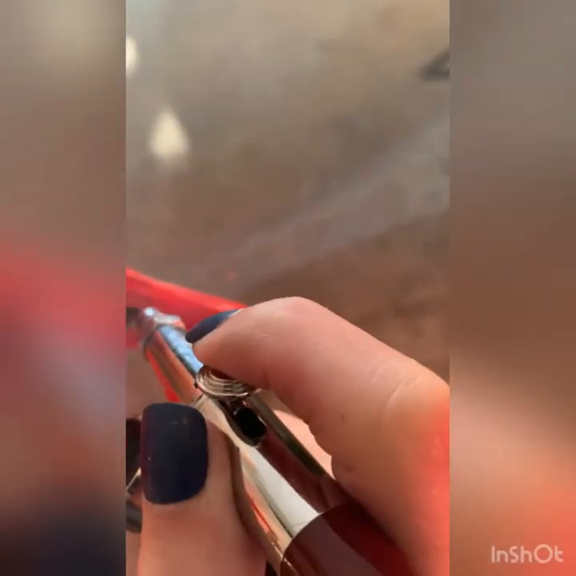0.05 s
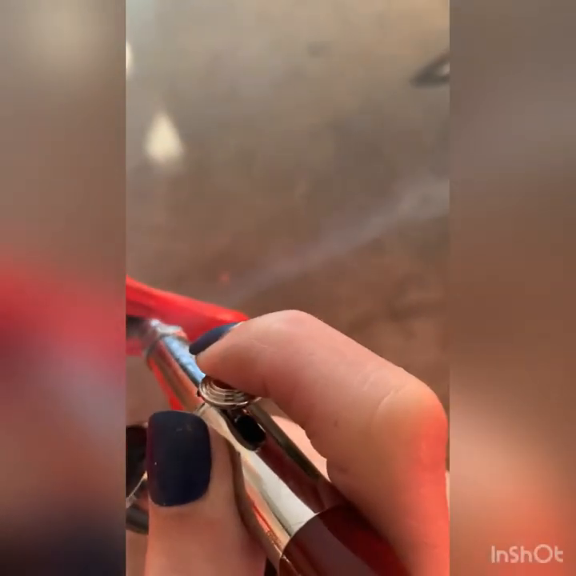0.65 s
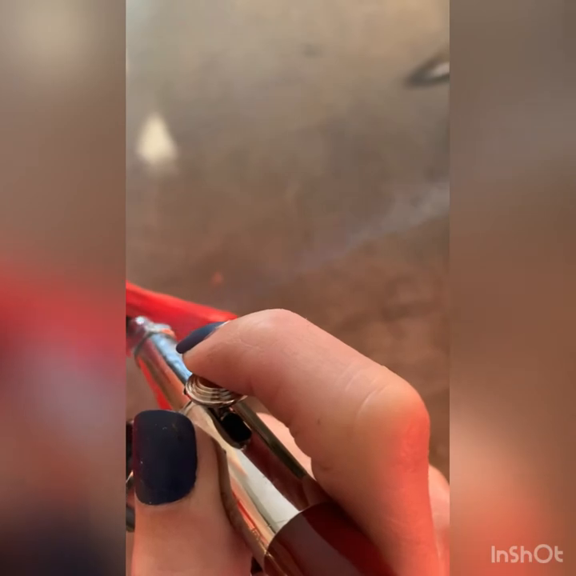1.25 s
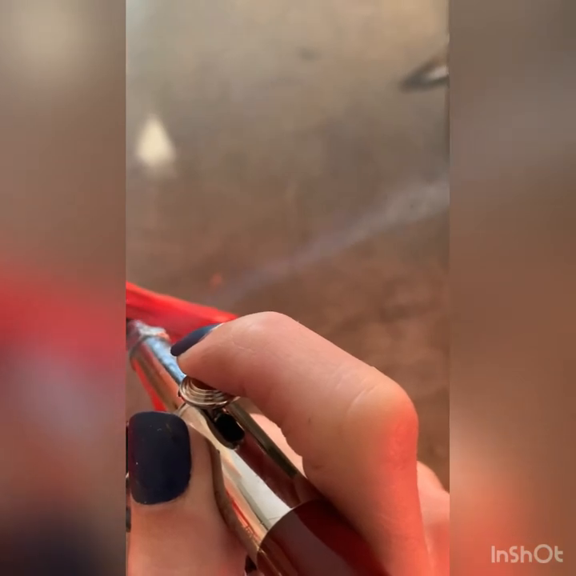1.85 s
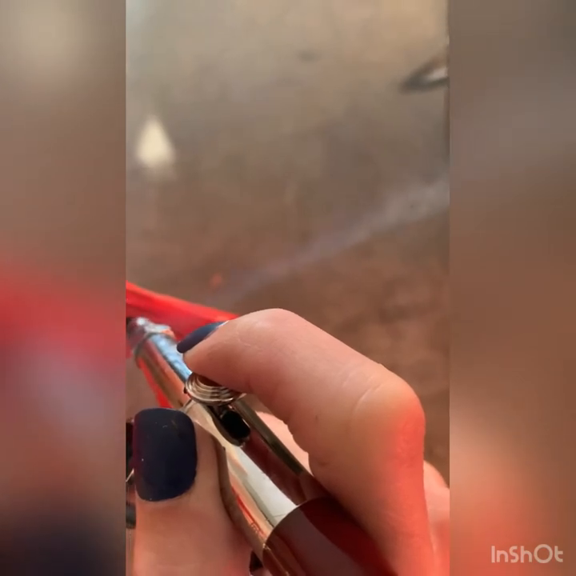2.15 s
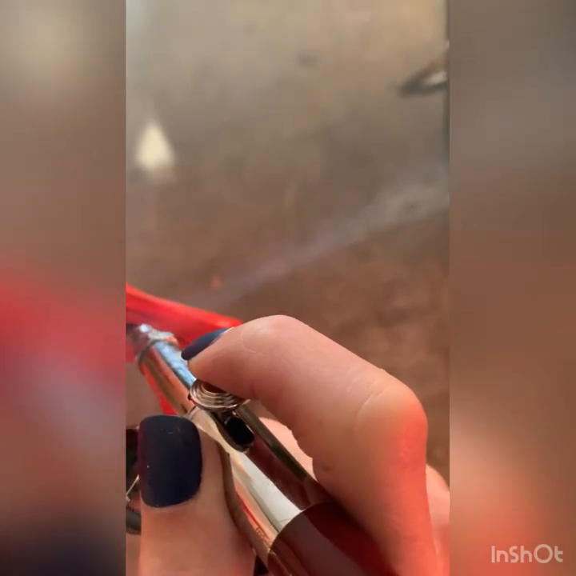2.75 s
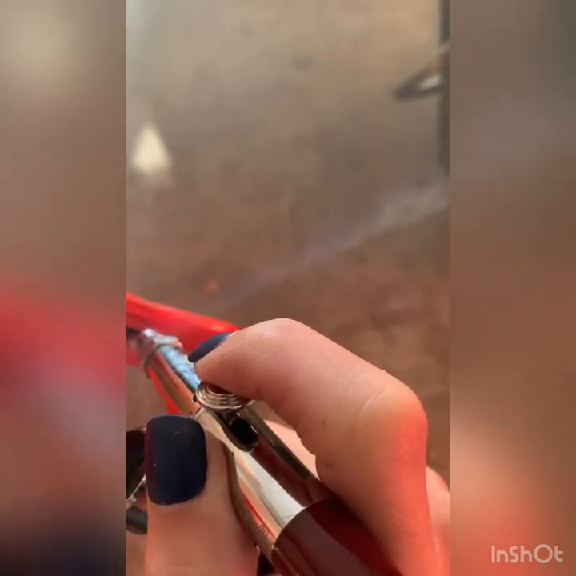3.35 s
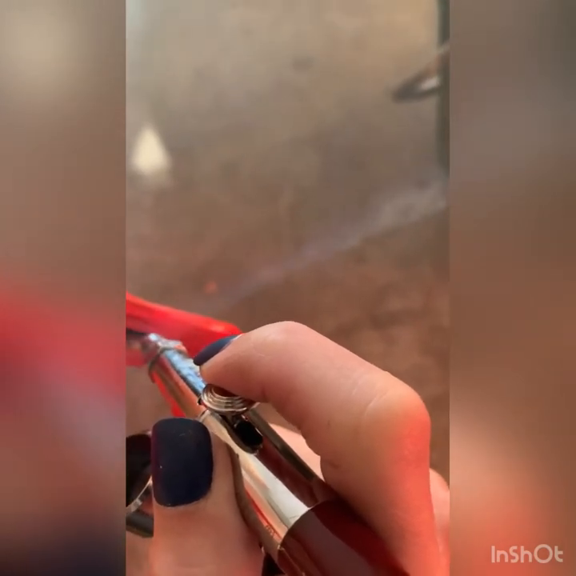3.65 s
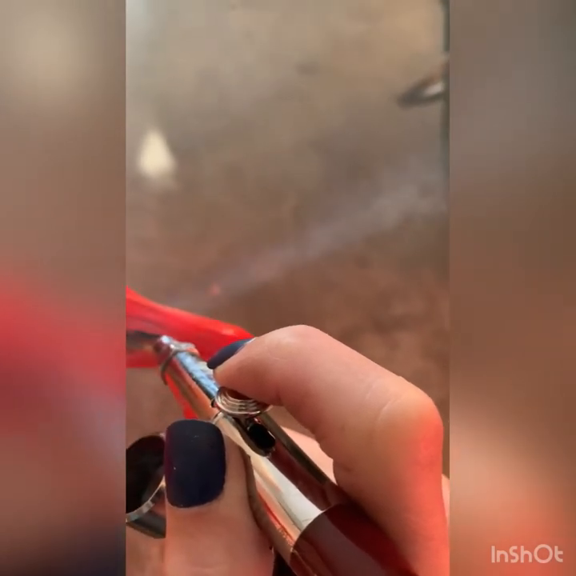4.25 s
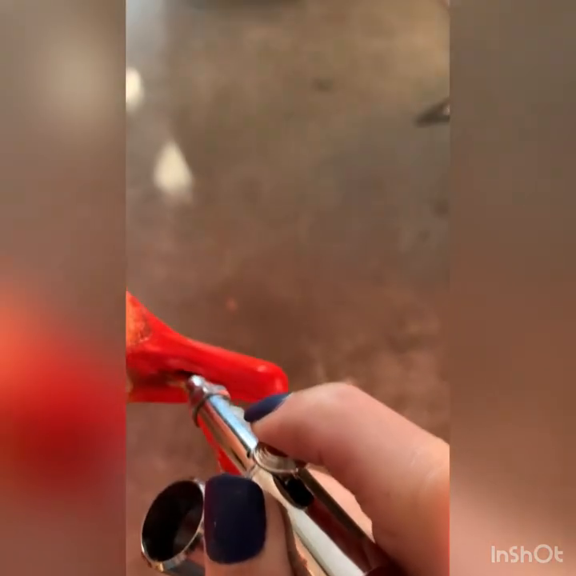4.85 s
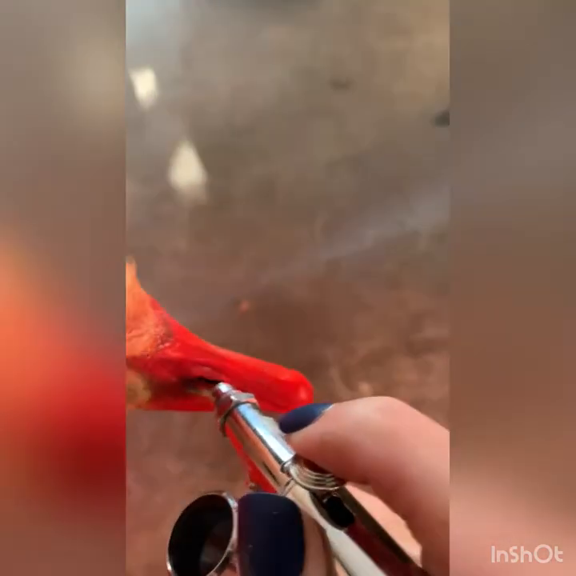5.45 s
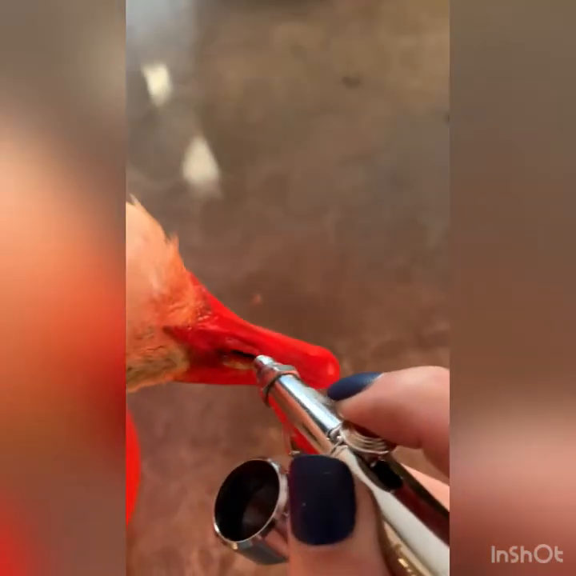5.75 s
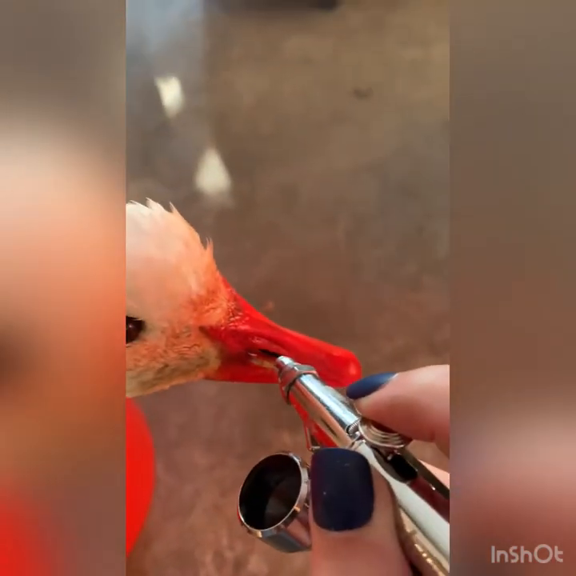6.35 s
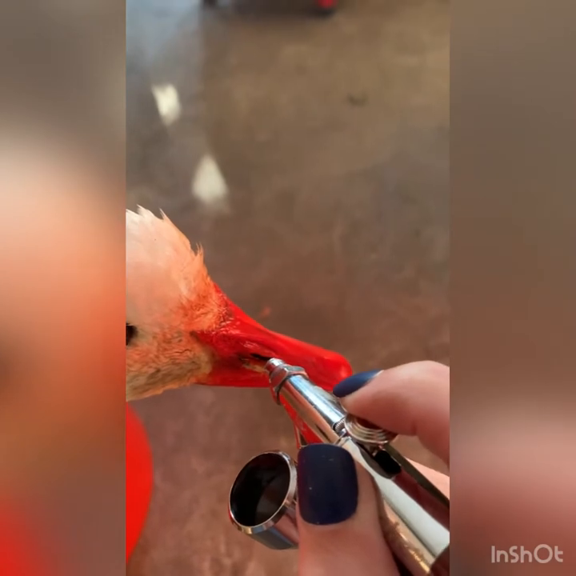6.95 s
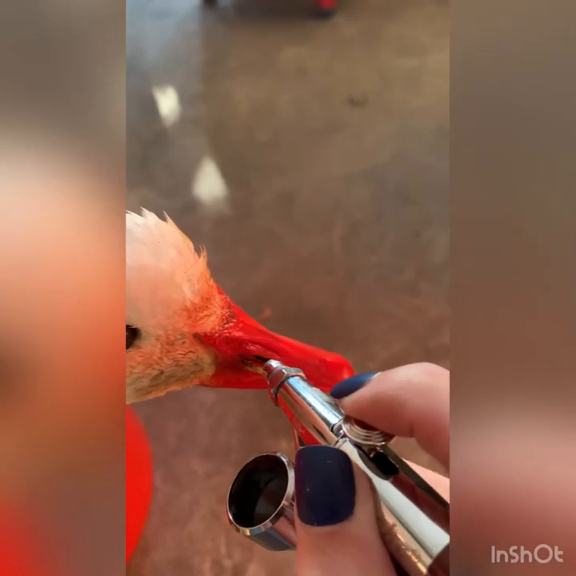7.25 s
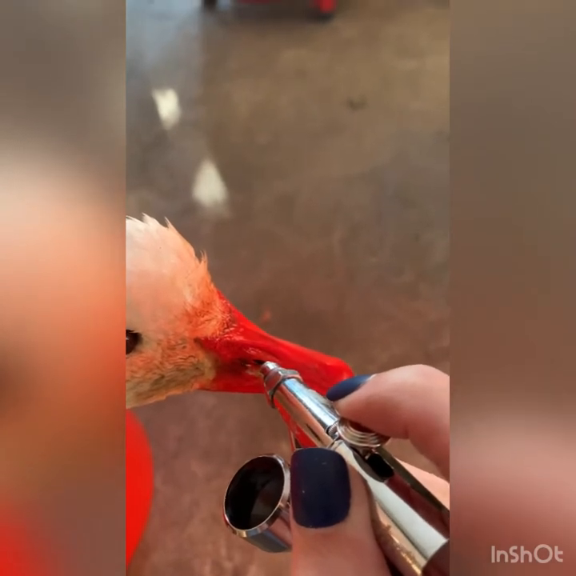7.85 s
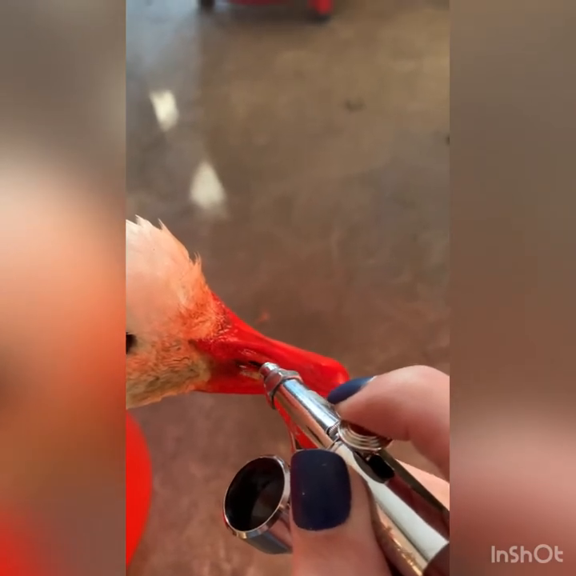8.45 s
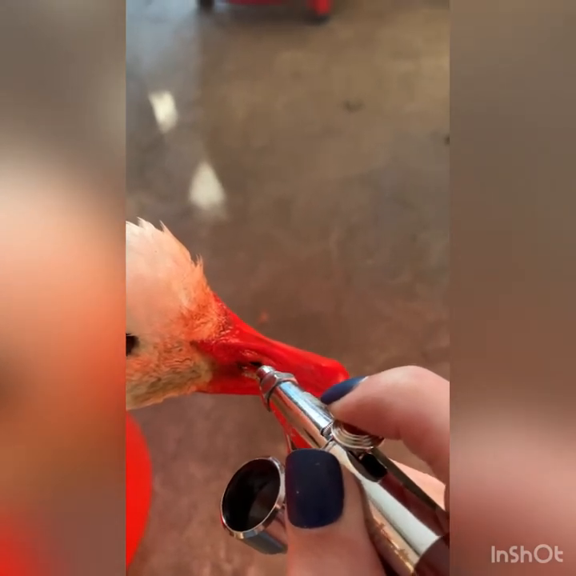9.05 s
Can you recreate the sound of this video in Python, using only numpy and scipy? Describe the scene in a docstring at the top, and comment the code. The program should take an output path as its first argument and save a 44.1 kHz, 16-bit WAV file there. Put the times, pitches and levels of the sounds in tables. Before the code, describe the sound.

An airbrush sprays a small figure close to the microphone in a small, dry room. A bright, high hiss starts almost at once and wavers as the hand moves, with two soft handling bumps beneath it. About halfway it cuts off sharply, leaving a low motor hum and dull room air. A second later the spray returns gently, opens up and runs to the end.

```python
"""An airbrush paints a small figure, a hand's width from a two-port microphone, in a small, dry room.
A motor hums throughout. At 0.4 s the trigger opens the valve: the turbulent jet hisses brightly and
adds a lower rush where it strikes the figure, changing as the hand moves. A brief low tone and two
soft bumps pass under it. At 5 s the jet cuts off sharply; the hand faintly brushes the figure.
At 6.1 s a second burst starts gently, opens up at 6.7 s and runs to the end."""
import sys
import numpy as np
from scipy import signal
from scipy.fft import rfft, irfft
from scipy.io import wavfile
from scipy.ndimage import uniform_filter1d

SR = 44100
rng = np.random.default_rng(int(sys.argv[2]) if len(sys.argv) > 2 else 0)


def wrap_up_sound(samples):
    """Save the sound to the file named by the first command line argument, as 16-bit audio."""
    columns = np.atleast_2d(samples).T
    # keep every value between -1 and 1, then stretch to whole-number steps
    tamed = np.clip(columns, -1, 1)
    steps = np.round(tamed * 32767).astype(np.int16)
    wavfile.write(sys.argv[1], SR, steps)


N = 406161
TIME_S = np.arange(N) / SR
FREQ_HZ = np.fft.rfftfreq(N, 1 / SR)

# Broad jet colour. Each row: frequency in Hz, relative density in dB.
JET_SPECTRUM = [(60, -45), (200, -31.0), (300, -28.0), (900, -25.1), (1500, -23.1), (2400, -16.8),
                (3500, -15.9), (5900, -13.5), (6500, -8.0), (8400, -6.7), (9200, -1.8), (10500, -4.4),
                (13000, -5.2), (15600, -3.6)]
# Peaks and dips from nozzle cap and near surfaces. Each row: centre in Hz, width in Hz, gain in dB.
JET_RESONANCES = [(580, 110, 3.3), (1020, 220, 4.2), (1230, 170, -5.6), (1620, 250, 5.2), (2150, 210, 5.4),
                  (2440, 200, 5.2), (2900, 120, 1.8), (3120, 130, -7.4), (3300, 150, 1.5), (3560, 170, -2),
                  (4950, 250, 1.5), (5600, 300, 1), (6580, 380, 4.5), (6900, 200, -3), (11140, 350, 2.1),
                  (11680, 280, -1.5), (12220, 310, 3.1), (14200, 730, 4.0)]
# The jet sits to the left. Each row: frequency in Hz, left port's phase lead in radians.
JET_PHASE_LEAD = [(100, 0), (650, -1.0), (1000, -.1), (1800, .1), (2150, 1.1), (2500, 1.1), (2850, .7),
                  (3300, 2.1), (3750, 2.2), (4300, 3.0), (4950, 3.3), (5300, 4.1), (6000, 5.0), (6500, 5.9),
                  (8800, 9.42), (11000, 12.57), (13150, 15.7), (15400, 18.85)]
# Jet likeness at the ports. Each row: frequency in Hz, coherence 0-1.
JET_COHERENCE = [(100, .95), (800, .7), (1100, .9), (1700, .94), (2400, .8), (3100, .7), (4100, 1),
                 (5000, 1), (5600, .88), (7500, .94), (8600, 1), (9200, 1), (10500, .93), (12800, 1),
                 (13500, 1), (15000, .93)]
# Jet balance. Each row: frequency in Hz, left minus right in dB.
JET_PAN = [(300, 3.2), (700, -3.2), (1300, -1.4), (2400, -1.5), (4400, 0), (15000, 0)]
# Reference bands of hiss, shush, rush and sizzle. Each row: low edge in Hz, high edge in Hz.
JET_BAND_EDGES = [(9500, 12400), (5500, 8400), (900, 3000), (13800, 15800)]
# Trigger presses. Each row: fully open at in seconds, opening time in seconds, release in seconds.
TRIGGER_PRESSES = [(0.419, 0.029, 4.959), (6.073, 0.066, 9.3)]
# Jet bands as the hand moves: first press, then the second, gentle and pulled further back.
# Each row: time in seconds, relative hiss level in dB, then shush, rush and sizzle in dB re hiss.
SPRAY_FIRST = [(0.43, -32, -2.5, -10, -3.5), (0.67, -32.5, -4, -11, -4), (0.72, -35, -4.5, -11.5, -2),
               (1.03, -34, -4, -11.5, -3.5), (1.08, -36, -2, -9.5, 2), (1.115, -31.5, -3, -12.5, -5),
               (1.18, -30, -1, -13.5, 0.5), (1.203, -24.5, -2.5, -15.5, -6), (1.252, -24, -4, -21.5, -7),
               (1.282, -30, -5.5, -13.5, -2), (1.345, -28.5, -4.5, -10.5, -2),
               (1.52, -34.5, -4.5, -15.5, -6), (1.6, -30.5, -4, -13, -1), (1.78, -32, -5.5, -16, -2),
               (1.85, -29, -6.5, -15, -4.5), (2.41, -26.5, -4.5, -15.5, -4.5),
               (2.57, -26.5, -5.5, -15.5, -4), (3.12, -35, -2.5, -9, 0), (3.34, -33.5, -3.5, -13, -2),
               (3.52, -32.5, -4.5, -9.5, -4), (3.72, -35.5, -1.5, -10.5, 0), (3.94, -31.5, -6, -13, -4),
               (3.99, -32.5, -2.5, -8.5, -2.5), (4.31, -33.5, -2, -12, -0.5), (4.45, -30.5, -5, -13.5, 4.5),
               (4.66, -26.5, -2.5, -19, 2.5), (4.8, -28.5, -3.5, -15.5, 2), (4.89, -26.5, -4, -20.5, 3),
               (4.95, -31.5, -3.5, -19, 1.5)]
SPRAY_GENTLE = [(6.085, -45.5, 5.5, -7.5, -3), (6.105, -37.5, 1.5, -18, -3), (6.165, -34.5, 3, -16, -1),
                (6.38, -34, -1, -17.5, -2), (6.486, -40.5, 3, -15, -1), (6.615, -35, -3, -19, -3),
                (6.655, -32.5, -4, -20, 2)]
SPRAY_FULL = [(6.685, -26.5, -6, -18, 3), (6.746, -29, -3, -14.5, 5.5), (6.9, -31, -0.5, -14, 5),
              (7.0, -26, -4, -14.5, -1), (7.15, -27, -4, -16.5, -1), (7.18, -27, -3, -20.5, 3),
              (7.25, -31, -3.5, -17.5, 0.5), (7.414, -26, -4.5, -21, 1.5), (7.59, -33, -4, -18.5, 0),
              (7.72, -31.5, -5, -19.5, 0), (7.941, -38, -2, -12.5, 4), (8.43, -30.5, -3.5, -20, -2),
              (8.502, -33.5, -3, -16.5, 1), (8.84, -29, -4.5, -19, 1.5), (9.02, -33, -5, -17, 2),
              (9.04, -35.5, 0, -11.5, 2), (9.18, -37, -2.5, -13, 2)]
# Nozzle path from the figure's thin tip to its broad head. Each row: time in seconds, share 0-1.
NOZZLE_PATH = [(4.1, 0), (4.7, 0.08), (6.1, 0.7)]
# Colour change at the path's end. Each row: centre in Hz, width in Hz, gain in dB.
HEAD_RESONANCES = [(1640, 550, 3), (2400, 650, -1.5), (3640, 130, -9), (4860, 220, 4), (6400, 430, -2),
                   (7500, 200, -3)]
# Small surfaces reflect short waves best. Each row: frequency in Hz, rms comb depth in dB.
ECHO_DEPTH = [(700, 1.9), (2200, 1.9), (6000, 2.2)]
# Valve leak whistles. Each row: centre in Hz, width in Hz, relative level in dB.
LEAK_WHISTLES = [(3850, 300, -8), (6500, 700, -2), (7350, 450, -0.5), (8000, 600, -4), (9500, 400, -7),
                 (15250, 400, -8)]
# Motor hum swell. Each row: time in seconds, relative level in dB.
HUM_SWELL = [(0.0, -69), (0.35, -48), (0.62, -43), (1.06, -78), (1.18, -67), (1.6, -49.5), (2.56, -44.5),
             (3.3, -51), (3.85, -52.5), (3.97, -66), (4.13, -52), (4.28, -56), (4.38, -48.5), (4.82, -53.5),
             (5.94, -42.5), (6.52, -51.5), (6.74, -47.5), (7.9, -52.0), (8.44, -59), (8.53, -78),
             (9.18, -68)]
# Motor hum and whirr tones. Each row: frequency in Hz, relative level in dB, waver 0-1.
HUM_PARTIALS = [(59.3, 2, 0.13), (192, -18.5, 0.7)]
WHIRR_PARTIALS = [(78.7, -10, 0.2), (191.3, -11.5, 1), (387.5, -16.5, .95), (558, -20.5, .95)]
# Hand on the airbrush. Each row: start in seconds, peak in dB, band frequency in Hz, decay in seconds.
HAND_KNOCKS = [(.192, -76, 3000, .003), (4.057, -48, 330, .01), (4.264, -44, 300, .012),
               (5.361, -77, 1600, .003), (5.519, -73, 9000, .002)]
# Sagging low tone. One row: start and length in seconds, first and last pitch in Hz, peak in dB.
SAGGING_TONE = (3.44, .125, 280, 240, -44)
# Hand on the figure. One row: start and length in seconds, centre and width in Hz, level in dB.
SKIN_STROKE = (5.1, .44, 1750, 650, -81)
# Room tail, strongest in the low treble as the highs beam onto the figure.
# Each row: frequency in Hz, T60 in seconds, level in dB re the direct sound.
ROOM_DECAY = [(200, .35, -26), (1200, .42, -20), (2500, .38, -17), (4500, .3, -24), (6400, .32, -19),
              (7500, .3, -20.5), (9000, .24, -25.5), (15000, .22, -26.5)]
# Room air colour. Each row: frequency in Hz, relative density in dB.
AIR_SPECTRUM = [(20, -19.5), (42, -15.5), (53, 6), (66, 2), (105, -1), (140, -7), (165, -8), (205, 1.5),
                (300, -18.5), (450, -16), (570, -18), (900, -27), (1450, -35.5), (1800, -36), (3000, -47.5),
                (5500, -53.5), (8000, -52), (15000, -61.5)]
# Room air likeness at the ports. Each row: frequency in Hz, coherence 0-1.
AIR_COHERENCE = [(100, 0.99), (250, 0.87), (600, 0.24), (3000, 0.15), (12000, 0.26)]
# Room air swell, shared by the whirr. Each row: time in seconds, level in dB.
AIR_LEVEL = [(0, -56), (.6, -52.5), (2.1, -53), (2.9, -56.5), (4, -54.5), (4.95, -57.5), (6.3, -53.5),
             (7.3, -55.5), (7.8, -59.5)]


def jet(flutter_db=0.45, flutter_hz=35, eddy_db=2.0):
    """Turbulent nozzle air: big eddies rush, smaller ones shush and hiss, the finest sizzle."""
    colour_db = over_log_hz(JET_SPECTRUM, FREQ_HZ) + bells_db(JET_RESONANCES, FREQ_HZ)
    lead_rad = curves(JET_PHASE_LEAD, FREQ_HZ)[0]
    balance_db = over_log_hz(JET_PAN, FREQ_HZ)
    air = noise_pair(colour_db, over_log_hz(JET_COHERENCE, FREQ_HZ), lead_rad, balance_db)
    hz, t, spectrum = signal.stft(air, SR, nperseg=1024, noverlap=768)
    gain_db = hand_motion_db(air, hz, t)
    # the nozzle-figure gap rings differently along the path
    gain_db += curves(NOZZLE_PATH, t)[0] * bells_db(HEAD_RESONANCES, hz)[:, None]
    # passing eddies lift patches of the spectrum
    eddies = uniform_filter1d(rng.standard_normal(spectrum.shape[1:]), size=4, axis=0)
    eddies = unit_rms(uniform_filter1d(eddies, size=12, axis=1))
    gain_db += eddy_db * eddies
    gain_db += over_log_hz(ECHO_DEPTH, hz)[:, None] * echo_combs(hz, t)
    air = signal.istft(spectrum * amp(gain_db), SR, nperseg=1024, noverlap=768)[1][:, :N]
    return air * valve_flow() * amp(flutter_db * drift(flutter_hz))  # paint feeds unevenly


def hand_motion_db(air, hz, t, tremor_db=0.5, tremor_hz=9):
    """Gain of the four jet bands as the hand moves; its tremor tilts the jet and varies the rush."""
    hiss_db, shush_db, rush_db, sizzle_db = curves([*SPRAY_FIRST, *SPRAY_GENTLE, *SPRAY_FULL], t)
    rush_db += tremor_db * np.interp(t, TIME_S, drift(tremor_hz))
    # band crossfades, corners in Hz
    rush = over_log_hz([(3000, 1), (6000, 0)], hz)[:, None]
    shush = over_log_hz([(8100, 1), (9000, 0)], hz)[:, None] - rush
    sizzle = over_log_hz([(12300, 0), (14000, 1)], hz)[:, None]
    hiss = 1 - rush - shush - sizzle
    bands = zip((hiss, shush, rush, sizzle), (0, shush_db, rush_db, sizzle_db), JET_BAND_EDGES)
    return hiss_db + sum(share * (db - band_rms_db(air, *edges)) for share, db, edges in bands)


def valve_flow(barely_open_db=-53.5, close_s=0.038, seep_db=-63):
    """Each press opens the valve linearly in dB; a spring snaps it shut; a trace still seeps."""
    flow = np.full(N, amp(seep_db))
    for open_s, opening_s, release_s in TRIGGER_PRESSES:
        closure = np.maximum((open_s - TIME_S) / opening_s, (TIME_S - release_s) / close_s)
        flow += amp(barely_open_db * np.clip(closure, 0, 2))
    return flow


def echo_combs(hz, t, sway_ms=0.032, sway_hz=0.44):
    """Weak echoes off hand, figure and bench comb the spectrum; the combs slide as the hand sways."""
    combs = 0
    for delay_ms in rng.uniform(4, 14, size=20):
        shift_ms = sway_ms * np.interp(t, TIME_S, drift(sway_hz))
        combs += np.cos(2 * np.pi * hz[:, None] * (delay_ms + shift_ms) / 1000)
    return unit_rms(combs)


def valve_leak(level_db=-91, coherence=0.71):
    """Air threads through narrow gaps in the valve: faint, fuzzy whistles."""
    power = sum(amp(db) ** 2 / (1 + (2 * (FREQ_HZ - centre_hz) / width_hz) ** 2) ** 2
                for centre_hz, width_hz, db in LEAK_WHISTLES)
    return amp(level_db) * noise_pair(10 * np.log10(power), coherence)


def motor(hum_gain_db=-1, hum_waver_hz=6, whirr_waver_hz=14):
    """A low hum swells and fades beside a steadier, wavering whirr."""
    hum = sum(amp(db) * partial(hz, waver, hum_waver_hz) for hz, db, waver in HUM_PARTIALS)
    whirr = sum(amp(db) * partial(hz, waver, whirr_waver_hz) for hz, db, waver in WHIRR_PARTIALS)
    hum *= amp(curves(HUM_SWELL, TIME_S)[0] + hum_gain_db)
    whirr *= amp(curves(AIR_LEVEL, TIME_S)[0])
    return hum + whirr


def hand_knocks():
    """The hand clicks and bumps on the airbrush: damped noise, no ring."""
    knocks, t = np.zeros(N), TIME_S[:SR // 10]
    for start_s, peak_db, hz, decay_s in HAND_KNOCKS:
        band = signal.butter(2, [hz / 2, hz * np.sqrt(2)], "bandpass", fs=SR, output="sos")
        knock = signal.sosfilt(band, rng.standard_normal(len(t)) * np.exp(-t / decay_s))
        add(knocks, start_s, amp(peak_db) * knock / abs(knock).max())
    return knocks


def low_tone():
    """One brief tone, sagging in pitch."""
    start_s, length_s, first_hz, last_hz, peak_db = SAGGING_TONE
    glide_hz = np.linspace(first_hz, last_hz, int(length_s * SR))
    tone = np.hanning(len(glide_hz)) * np.sin(2 * np.pi * np.cumsum(glide_hz) / SR)
    track = np.zeros(N)
    add(track, start_s, amp(peak_db) * tone)
    return track


def skin_rustle(uneven_db=3.0, uneven_hz=14, coherence=0.3):
    """Skin slides unevenly over the figure: a faint noise band swells and fades."""
    start_s, length_s, centre_hz, width_hz, level_db = SKIN_STROKE
    stroke = np.sin(np.pi * np.clip((TIME_S - start_s) / length_s, 0, 1))
    band_db = -20 * np.log10(1 + (2 * (FREQ_HZ - centre_hz) / width_hz) ** 4)
    return noise_pair(band_db, coherence) * stroke * amp(level_db - uneven_db * drift(uneven_hz))


def room_tail(direct):
    """Short diffuse reverberation, different at each port; the treble dies first."""
    hz, t, spectrum = signal.stft(rng.standard_normal((2, SR // 2)), SR, nperseg=256)
    t60_s, level_db = curves(ROOM_DECAY, hz[:, None])
    unit_energy = np.sqrt(2 * np.log(1000) / (t60_s * SR))
    decay = unit_energy * amp(level_db - 60 * t / t60_s)
    response = signal.istft(spectrum * decay, SR, nperseg=256)[1]
    return signal.fftconvolve(direct, response, axes=1)[:, :N]


def room_air():
    """Dull noise of moving air, nearly mono in the bass."""
    air = noise_pair(over_log_hz(AIR_SPECTRUM, FREQ_HZ), over_log_hz(AIR_COHERENCE, FREQ_HZ))
    return air * amp(curves(AIR_LEVEL, TIME_S)[0])


def noise_pair(colour_db, coherence, lead_rad=0, balance_db=0):
    """Partly coherent coloured noise at the two ports, rms 1."""
    common, other = rfft(rng.standard_normal((2, N)))
    left = common * np.exp(1j * lead_rad) * amp(balance_db / 2)
    right = (coherence * common + np.sqrt(1 - coherence ** 2) * other) * amp(-balance_db / 2)
    return unit_rms(irfft(np.array([left, right]) * amp(colour_db), N))


def partial(hz, waver, rate_hz):
    """A tone whose strength and phase wander by the share waver."""
    wobble = (1 - waver) + waver * (drift(rate_hz) + 1j * drift(rate_hz)) / np.sqrt(2)
    carrier = np.exp(2j * np.pi * (hz * TIME_S + rng.random()))
    return np.sqrt(2) * (wobble * carrier).real


def drift(rate_hz):
    """Slow random motion, rms 1."""
    return unit_rms(irfft(rfft(rng.standard_normal(N)) / (1 + (FREQ_HZ / rate_hz) ** 4), N))


def band_rms_db(pair, low_hz, high_hz):
    """Level of one band in the mean of both ports."""
    band = rfft(pair.mean(0))[(FREQ_HZ >= low_hz) & (FREQ_HZ < high_hz)]
    return 10 * np.log10(2 * np.sum(abs(band) ** 2) / N ** 2)


def bells_db(peaks, hz):
    """Sum of bell-shaped peaks and dips."""
    return sum(db * np.exp2(-(2 * (hz - centre_hz) / width_hz) ** 2) for centre_hz, width_hz, db in peaks)


def over_log_hz(rows, hz):
    """Interpolates a table over log frequency."""
    row_hz, values = np.transpose(rows)
    return np.interp(np.log(hz + 1), np.log(row_hz + 1), values)


def curves(rows, at):
    """Interpolates each later column linearly over the first."""
    axis, *columns = np.transpose(rows)
    return [np.interp(at, axis, column) for column in columns]


def add(mix, start_s, sound):
    """Mixes a sound in place."""
    part = mix[round(start_s * SR):][:len(sound)]
    part += sound[:len(part)]


def amp(db):
    """Decibels to gain."""
    return 10 ** (np.asarray(db) / 20)


def unit_rms(x):
    """Scales to rms 1."""
    return x / np.sqrt(np.mean(x ** 2) + 1e-20)


def scene(jet_gain_db=-0.61):
    """Close airbrush and handling, their room tail, motor and room air."""
    near = amp(jet_gain_db) * jet() + valve_leak() + hand_knocks() + low_tone() + skin_rustle()
    return near + room_tail(near) + motor() + room_air()


def record(dry, cutoff_hz=15800):
    """Steep low-pass band limit."""
    lowpass = signal.firwin(1023, cutoff_hz, window=("kaiser", 9), fs=SR)
    return signal.oaconvolve(dry, lowpass[None], "same")


dry = scene()
out = record(dry)
wrap_up_sound(out)
```